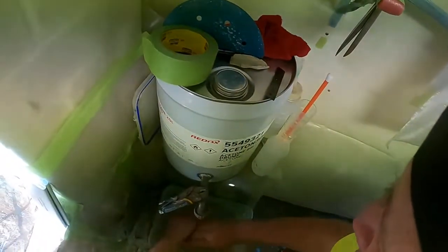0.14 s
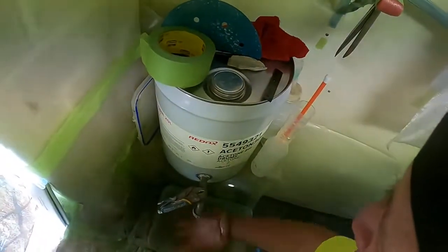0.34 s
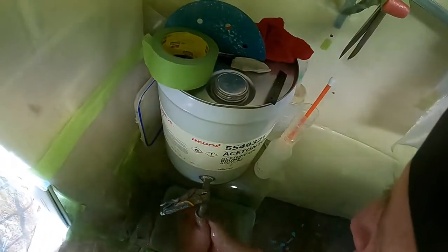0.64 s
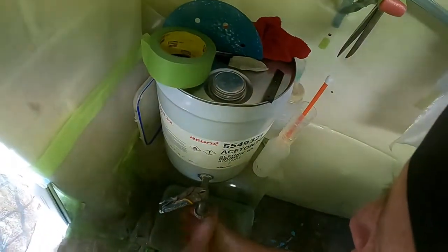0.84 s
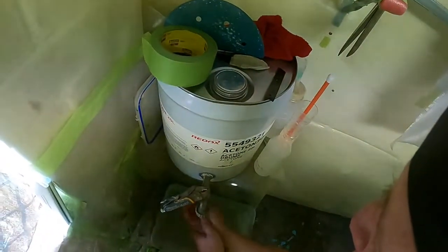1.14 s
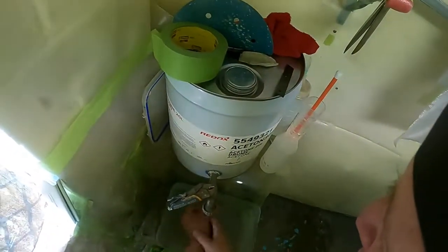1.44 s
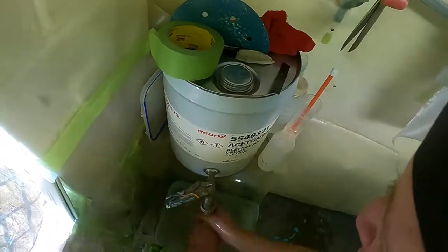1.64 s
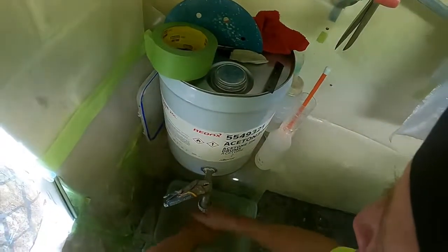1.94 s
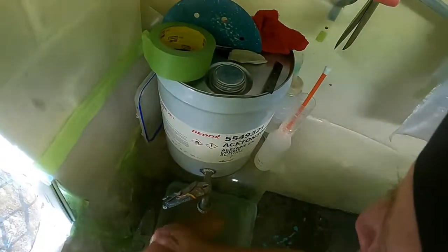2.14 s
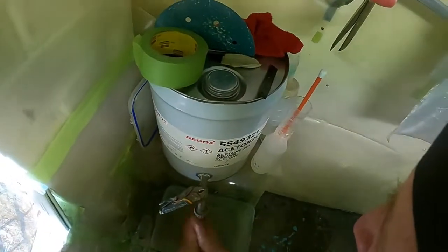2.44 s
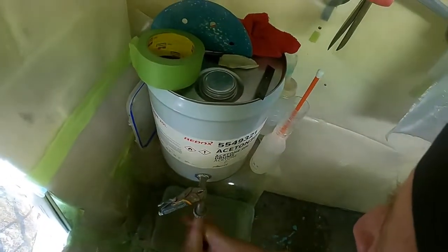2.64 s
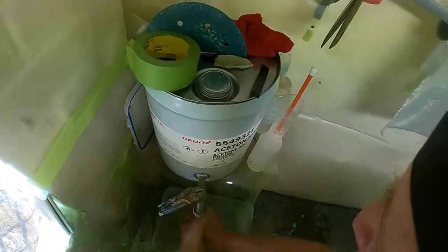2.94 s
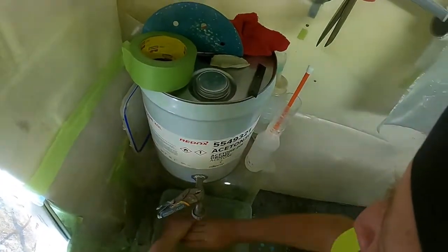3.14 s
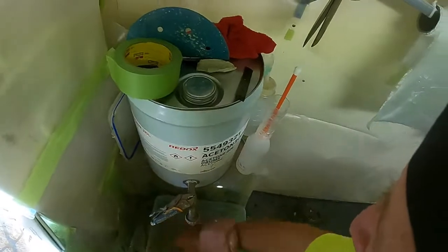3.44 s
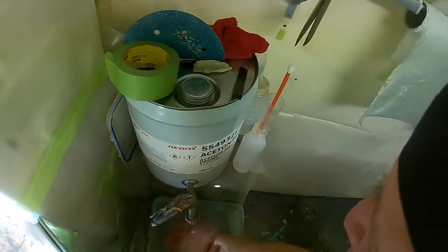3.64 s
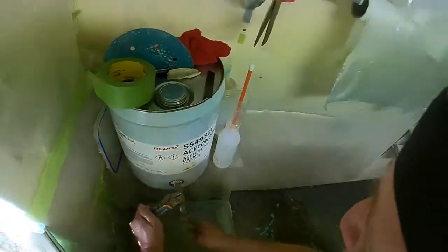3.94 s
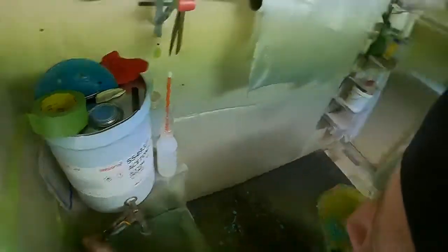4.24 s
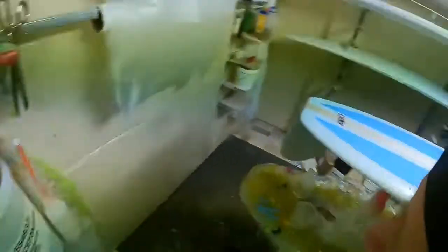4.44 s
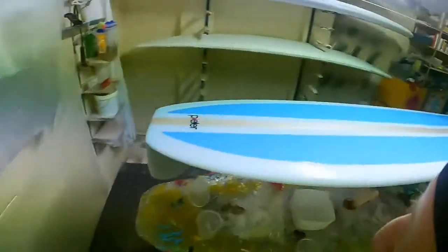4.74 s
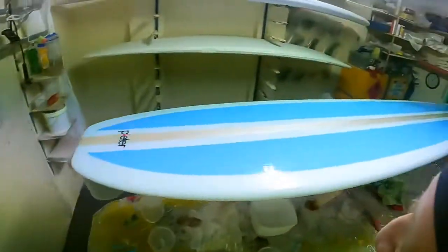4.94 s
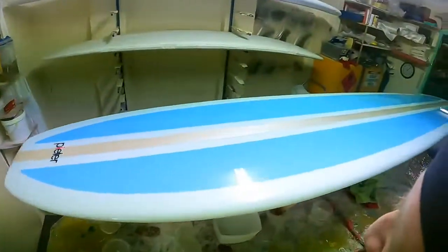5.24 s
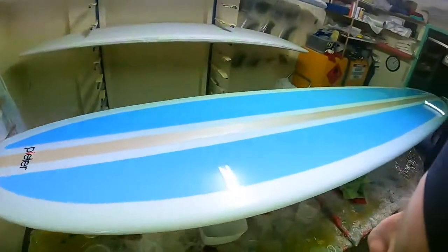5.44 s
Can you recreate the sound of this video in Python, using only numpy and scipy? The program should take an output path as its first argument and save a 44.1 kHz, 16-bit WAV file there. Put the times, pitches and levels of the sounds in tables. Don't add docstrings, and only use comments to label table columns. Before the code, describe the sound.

In a small, dry-sounding workshop, a thin stream breaks over rubbing hands: fizzy splashes, bright droplets, skin and sleeve rustle, dull wet-palm pops. At about four seconds the hands shake off last drops, then cloth rustles and heavier low thuds follow as the wearer turns. A body-worn camera in a closed case colours everything as boxy and resonant.

```python
import sys
import numpy as np
from scipy import signal
from scipy.fft import rfft, irfft, next_fast_len
from scipy.io import wavfile

SR = 44100
rng = np.random.default_rng(int(sys.argv[2]) if len(sys.argv) > 2 else 0)


def to_wav(s):
    ch = np.atleast_2d(s).T
    pcm = np.round(np.clip(ch, -1, 1) * 32767)
    wavfile.write(sys.argv[1], SR, pcm.astype(np.int16))


def boost(x):
    u = np.asarray(x, float) / 20
    return 10 ** u


N = 246122
HZ = np.fft.rfftfreq(next_fast_len(N + SR), 1 / SR)


def rms_one(x):
    return x / np.sqrt(np.mean(x ** 2) + 1e-20)


def at_hz(points):
    hz, value = np.transpose(points)
    return np.interp(np.log(HZ + 1), np.log(hz + 1), value)


def drift(rate_hz):
    pole = np.exp(-80 * np.pi * rate_hz / SR)
    white = rng.standard_normal(N // 40 + 2002)
    slow = signal.lfilter([1], [1, -2 * pole, pole * pole], white)[2000:]
    return np.interp(np.arange(N) / 40, np.arange(len(slow)), rms_one(slow))


def swells(rest_db, s, peak_db, fade_s, rise):
    t = np.arange(0, N + 32, 32) / SR
    late = (t[:, None] - s) / np.maximum(fade_s, .005)
    fallen_db = 10 * np.where(late > 0, late, -late / rise)
    power = np.sum(boost(2 * (peak_db - fallen_db)), axis=1)
    power = np.interp(np.arange(N) / SR, t, power)
    return 10 * np.log10(boost(2 * rest_db) + power + 1e-30)


def filtered(x, response):
    size = 2 * (len(HZ) - 1)
    return irfft(rfft(x, size) * response, size)[..., :N]


# (frequency [Hz], width [Hz], lift [dB])
CAVITIES = [(1530, 61, 4), (2887, 280, 7), (3980, 105, 5.5), (4770, 740, 8.5), (5600, 154, 7),
            (6090, 380, 8.5), (6530, 160, 9)]


def colour(x, spectrum, case=1):
    lift_db = sum(db / (1 + (2 * (HZ - hz) / width) ** 2) for hz, width, db in CAVITIES)
    level_db = at_hz(spectrum) + case * lift_db
    cepstrum = irfft(level_db * np.log(10) / 20)
    cepstrum[1:len(HZ) - 1] *= 2
    cepstrum[len(HZ):] = 0
    return filtered(x, np.exp(rfft(cepstrum)) / np.sqrt(np.mean(boost(2 * level_db))))


def in_room(x):
    room_t60_s, room_db = .1, -10
    t = np.arange(round(.2 * SR)) / SR
    tail = rng.standard_normal(len(t)) * boost(-60 * t / room_t60_s) * (t > .001)
    echo = signal.fftconvolve(x, tail / np.sqrt(np.sum(tail ** 2)))[:N]
    return np.array([x + boost(room_db) * echo, echo])


def ring(clicks, hz, t60):
    r, w = boost(-60 / (t60 * SR)), 2 * np.pi * hz / SR
    return signal.lfilter([0, np.sin(w)], [1, -2 * r * np.cos(w), r * r], clicks + 1e-18)


def plink(out, s, level_db, hz, t60, rise, attack_s):
    start, t = round(s * SR), np.arange(round(.08 * SR)) / SR
    tone = np.sin(2 * np.pi * hz * t * (1 + rise * t / t60))
    tone = tone * boost(-60 * t / t60) * (1 - np.exp(-t / attack_s))
    out = out.copy()
    out[start:start + len(t)] += boost(level_db) * tone
    return out


def dying(strengths, t60, attack_s):
    fall, swell = boost(-60 / (t60 * SR)), np.exp(-1 / (attack_s * SR))
    envelope = signal.lfilter([1 - swell], np.convolve([1, -fall], [1, -swell]), strengths)
    return envelope * rng.standard_normal((2, N))


# (time [s], level [dB])
FLOW = [(0.0, -57.5), (0.15, -64.5), (0.23, -60.5), (0.36, -56), (0.64, -55.5), (0.72, -59), (0.95, -61),
        (1.25, -64.5), (1.44, -55.5), (1.52, -57), (1.62, -62.5), (2.08, -60), (2.14, -56), (2.58, -58),
        (2.66, -64.5), (2.85, -63), (3.15, -59.5), (3.85, -62), (4.86, -62), (5.58, -69)]
# (peak time [s], splash level [dB], time to fade 10 dB [s], mist level [dB])
STROKES = [(0.108, -48.5, 0.04, -70.5), (0.26, -51, -0.1, -87), (0.66, -56, 0.02, -69),
           (0.8, -51.5, -0.17, -78), (1.37, -56.5, -0.03, -63), (1.681, -47, -0.0052, -62),
           (1.849, -50, 0.06, -65.5), (2.004, -48, -0.0649, -79), (2.24, -51, 0.02, -75),
           (2.38, -57, 0.05, -72), (2.46, -64, 0.05, -71), (2.527, -46.5, 0.0237, -69),
           (2.911, -48, -0.0865, -61.5), (3.182, -63, -0.0643, -56), (3.195, -50, -0.09, -71),
           (3.526, -47, 0.04, -70), (3.671, -56, 0.02, -73), (3.787, -58, -0.03, -56.5),
           (4.216, -58, 0, -76), (4.33, -53, 0.04, -78), (4.398, -47, 0, -75), (4.44, -50, -0.06, -66),
           (4.89, -52.5, 0.02, -89), (5.37, -58.5, 0.13, -85)]
# (frequency [Hz], level per Hz [dB])
SPLASH = [(900, -39.5), (2000, -14), (3300, -9.5), (4500, -3), (6000, -8), (7000, -7.5), (8000, -16),
          (10000, -50)]
# (frequency [Hz], level per Hz [dB])
MIST = [(5500, -29), (7200, -5.5), (8500, 7), (10000, -1.5), (11500, -14), (13000, -6), (15000, -45)]


def splash():
    drops_per_s = 600
    s, flow = np.transpose(FLOW)
    flow_db = np.interp(np.arange(N) / SR, s, flow)
    s, stroke_db, fade_s, stroke_mist_db = np.transpose(STROKES)
    splash_db = swells(flow_db, s, stroke_db, fade_s, rise=1)
    mist_rest_db = -79 + 0.62 * (flow_db + 61.0)
    mist_db = swells(mist_rest_db, s, stroke_mist_db, 0.92 * fade_s, rise=1)

    sizes = boost(2.5 * np.minimum(rng.exponential(1, N), 4)) * rng.choice([-1, 1], N)
    clump_db = .5 * drift(12) + 1.8 * drift(50)
    clicks = sizes * (rng.random(N) < drops_per_s * boost(clump_db) / SR)
    pitches, dealt = np.geomspace(1500, 14000, 20), rng.integers(0, 20, N)
    bubbles = rms_one(sum(ring(clicks * (dealt == k), hz, 64.0 / hz) for k, hz in enumerate(pitches)))
    film = boost(-0.5 + 1.1 * clump_db) * rng.standard_normal((2, N))
    liquid = boost(-5.5) * in_room(bubbles) + film
    return colour(boost(splash_db - 1.0) * liquid, SPLASH) + colour(boost(mist_db - 3.0) * liquid[::-1], MIST)


# (peak time [s], skin level [dB], time to fade 10 dB [s], sleeve level [dB])
RUBS = [(0.0, -57, 0.07, -65), (0.4, -62.5, 0.4, -83), (0.875, -59.5, 0.02, -60.5),
        (0.946, -56, -0.04, -59), (1.096, -52, 0.02, -59.5), (1.509, -55, -0.04, -90),
        (1.662, -54.5, 0.04, -68.5), (1.828, -52.5, 0.0468, -58.5), (2.05, -61, 0.32, -71.5),
        (2.87, -81, 0.08, -71.5), (3.015, -66, -0.01, -61), (3.4, -56, 0, -93.5), (3.508, -58, 0.12, -80),
        (3.85, -58.5, 0.07, -72), (3.95, -59, 0.09, -63.5), (4.26, -56, 0.13, -63),
        (4.538, -56, 0.05, -67.5), (4.695, -54.5, 0.04, -69), (4.8, -55, 0.05, -62.5),
        (4.899, -56, 0.07, -66.5), (5.08, -57, 0.04, -65), (5.18, -56, 0.05, -63), (5.3, -63, 0.2, -70)]
# (frequency [Hz], level per Hz [dB])
SKIN = [(500, -16.5), (900, -13), (1150, -1.5), (1700, -0.5), (2300, -11.5), (3500, -12.5), (6000, -25.5),
        (9000, -65.5)]
# (frequency [Hz], level per Hz [dB])
SLEEVE = [(150, -16.5), (280, 1), (450, 2.5), (750, 0.5), (950, -4.5), (1500, -40.5)]


def rustle():
    s, skin, fade_s, sleeve = np.transpose(RUBS)
    skin_db = swells(-65.5, s, skin, fade_s, rise=0.83)
    sleeve_db = swells(-79, s, sleeve, fade_s, rise=0.83)
    lumps = boost(0.68 * drift(25) + 1.7 * drift(44))
    white = rng.standard_normal((2, 2, N))
    return colour(boost(skin_db) * lumps * white[0], SKIN) + colour(boost(sleeve_db) * lumps * white[1], SLEEVE)


# (frequency [Hz], level per Hz [dB])
AIR = [(60, -35), (110, -21.5), (160, 1), (270, -1), (500, -5.5), (900, -30), (1080, -27), (1540, 4.5),
       (2360, -9), (4300, -6), (6300, -24), (7600, -22.5), (10000, -44), (13000, -59)]


def room_tone():
    level_db = -60 - 6.5 + .5 * drift(3.5)
    return colour(boost(level_db) * rng.standard_normal((2, N)), AIR, case=0.15)


def shake(level_db, spectrum, top_hz):
    wobble = colour(rng.standard_normal(N), spectrum, case=0)
    envelope = np.abs(signal.hilbert(wobble, next_fast_len(N))[:N])
    evened = rms_one(wobble / envelope ** .75)
    return signal.sosfilt(signal.butter(4, top_hz, fs=SR, output="sos"), boost(level_db) * evened)


# (peak time [s], sway level [dB], time to fade 10 dB [s], jolt level [dB], body thump level [dB])
MOVES = [(0.03, -40, 0.12, -48, -68.5), (0.13, -33, -0.05, -52, -71), (0.371, -57, -0.24, -62, -54),
         (0.64, -39, 0.7, -63, -76.5), (0.76, -36.5, 0.24, -57, -88), (0.87, -29.5, 0.15, -50.5, -68),
         (1.12, -34.5, 0.08, -54.5, -68), (1.57, -35, 0.17, -64, -83), (1.66, -32.5, -0.07, -70, -66),
         (1.82, -28.5, 0.2, -57.5, -68.5), (2.02, -26.5, 0.19, -55, -66), (2.25, -34.5, 0.34, -67, -67),
         (2.55, -39.5, 0.7, -72, -80), (3.07, -60, 0.11, -48.5, -64.5), (3.2, -32, 0.1, -82, -79),
         (3.509, -34.5, 0.13, -61, -67), (3.76, -28, 0.08, -57.5, -78), (4.085, -37, 0.1, -54.5, -62.5),
         (4.32, -45, 0.3, -51.5, -67), (4.778, -31.5, -0.11, -59, -64), (4.89, -43.5, 0.34, -52, -64),
         (4.97, -43, 0.11, -56, -60.5), (5.07, -34, 0.3, -42.5, -65), (5.19, -26, 0.22, -46, -61),
         (5.27, -42, 0.2, -50, -64.5)]
# (frequency [Hz], level per Hz [dB])
SWAY = [(5, -24.5), (10, 7.5), (22, 0), (35, -3.5), (48, -18), (60, -35), (100, -36)]
# (frequency [Hz], level per Hz [dB])
JOLT = [(30, -39.5), (50, 3.5), (65, -12), (85, -15.5), (110, -22), (200, -68.5)]
# (frequency [Hz], level per Hz [dB])
THUMP = [(70, -19), (120, -7.5), (150, 3), (200, 4), (270, -12), (500, -49.5)]


def moves():
    s, sway, fade_s, jolt, body = np.transpose(MOVES)
    sway_db = swells(-51, s, sway, fade_s, rise=0.96) - 11
    jolt_db = swells(-89, s, jolt, 0.35 * fade_s, rise=0.96)
    thump_db = swells(-74.5, s, body, 0.91 * fade_s, rise=0.96) + 2.55 * drift(32)
    thump = colour(boost(thump_db) * rng.standard_normal((2, N)), THUMP, case=0)
    return thump, shake(sway_db, SWAY, top_hz=45.6) + shake(jolt_db, JOLT, top_hz=116)


# (time [s], peak level [dB], pitch [Hz], coarse
# spray level [dB])
DROPS = [(0.0137, -32.5, 3990, -10.5), (0.0917, -34.5, 6650, -23), (0.241, -33, 6090, -59),
         (0.2676, -33.5, 4660, -19), (0.363, -36.5, 6010, -7.5), (0.446, -31, 6040, -32),
         (0.483, -40, 5530, -9), (0.592, -33, 4760, -14), (0.59, -36, 3900, -24),
         (0.8735, -35.5, 4760, -10.5), (0.9758, -38, 4750, -23), (1.2796, -37.5, 6160, -53),
         (1.3527, -22, 4570, -24), (1.354, -35, 6730, -27), (1.3595, -31, 4700, -30),
         (1.387, -33, 6680, -14), (1.5264, -35.5, 4690, -11.5), (1.6463, -28, 4640, -15),
         (1.6804, -39, 4500, -2.5), (1.787, -39, 6280, -25), (1.989, -33, 4780, -35),
         (2.034, -32.5, 4490, -25), (2.1131, -38, 4720, -9.5), (2.4678, -36, 6200, -15),
         (2.601, -39, 4640, -32), (2.9024, -38, 4650, -17), (3.097, -39, 4600, -6.5),
         (3.1776, -37, 3980, -6.5), (3.476, -31, 4740, -14), (3.5055, -26.5, 4810, -15),
         (3.529, -28, 4610, -20), (3.1695, -33, 6200, -29),
         (3.749, -39, 4700, -7.5), (3.787, -36.5, 6800, -16), (4.248, -39, 6270, -7),
          (3.944, -43, 6370, -18), (4.2064, -29, 4750, -7.5), (4.2072, -33, 3970, -19),
          (4.366, -30.5, 4680, -19), (4.3904, -24, 5600, -22), (4.3972, -24.5, 4720, -42),
          (4.4224, -35.5, 4580, -6.5), (4.486, -35, 4650, -15), (4.7656, -37.5, 4790, -23),
          (4.901, -36, 2980, -12.5),
         (0.0478, -35.5, 4650, -11), (0.3964, -48, 4660, -19), (0.539, -36, 5600, -12),
               (0.7412, -40, 6060, -11.5), (1.192, -39, 6170, -30), (1.2161, -45, 6670, -27),
               (1.3085, -45, 4820, -29), (1.429, -42, 4580, -25), (1.4676, -42, 4700, -5),
               (1.815, -34, 6260, -23), (1.8871, -39, 4800, -15), (2.1475, -45, 4890, -20),
               (2.1959, -39, 4700, -13), (2.251, -39, 4630, -12), (2.327, -48, 3960, -18),
               (2.4468, -46, 4800, -12), (2.5067, -35, 6540, -26), (2.5213, -33, 5600, -30),
               (2.5344, -36, 4920, -24), (2.743, -39.5, 4770, -15), (2.8926, -42, 4750, -18),
               (2.9828, -40, 4660, -20.5), (3.018, -37, 6500, -30), (3.0414, -57, 6240, -18),
               (3.6646, -40, 4700, -20), (4.0724, -39.5, 2860, -20), (4.3324, -39, 4700, -18),
               (4.391, -26.5, 4780, -27), (4.4424, -41, 4400, -9), (4.8705, -41, 4680, -18)]
# (frequency [Hz], level per Hz [dB])
COARSE = [(1500, -52.5), (2400, -0.5), (3000, 0.5), (4200, 3.5), (5500, -48), (9000, -70)]
# (frequency [Hz], level per Hz [dB])
FINE = [(3500, -24), (4800, 2), (6000, 4), (7200, 0.5), (9000, -13), (11500, -23), (14000, -49)]


def drops():
    tones, coarse, fine = np.zeros((3, N))
    for s, db, hz, coarse_db in DROPS:
        tones = plink(tones, s, db - 4.5, hz, min(127.0 / hz, .026), rise=0.0043, attack_s=0.00093)
        coarse[round(s * SR)] = boost(db + coarse_db - 6.5)
        fine[round(s * SR)] = boost(-51 + 0.16 * (db + 39.5) - 3)
    spray = colour(dying(coarse, 0.077, attack_s=0.001), COARSE)
    spray = spray + colour(dying(fine, 0.038, attack_s=0.00034), FINE)
    broken = np.clip(0.92 + 0.38 * drift(160), 0, 3)
    return in_room(tones * broken) + spray


# (time [s], peak level [dB], t60 [s])
SMACKS = [(0.0154, -45, 0.03), (0.2414, -44, 0.02), (0.3626, -46, 0.03), (0.483, -39, 0.038),
          (0.5906, -44, 0.03), (0.8729, -45.5, 0.03), (1.3493, -50, 0.03), (1.3533, -44, 0.03),
          (1.388, -42, 0.03), (1.4674, -56, 0.025), (1.6474, -53, 0.03), (1.6774, -50, 0.025),
          (1.7883, -47, 0.03), (2.1488, -44, 0.027), (2.7112, -50, 0.03), (2.7926, -64, 0.025),
          (2.9004, -53, 0.03), (3.178, -37, 0.04), (3.43, -46, 0.03), (3.477, -40.5, 0.035),
          (3.504, -40, 0.03), (3.527, -37, 0.027), (3.7489, -44, 0.037), (3.7864, -41.5, 0.025),
          (3.9447, -44.5, 0.028), (4.207, -42, 0.03), (4.3645, -41.5, 0.037), (4.3802, -36, 0.041),
          (4.3895, -39, 0.03), (4.4215, -41, 0.03), (4.4414, -53, 0.03), (4.7114, -58, 0.03),
          (4.8944, -50, 0.03)]
# (frequency [Hz], level per Hz [dB])
SMACK = [(1500, -32), (2500, -3), (4000, -5.5), (6000, 0), (7500, 0.5), (9000, -13), (11500, -30.5),
         (14000, -33)]


def smacks():
    envelope, t = np.zeros(N), np.arange(round(.1 * SR)) / SR
    for s, db, t60 in SMACKS:
        start = round(s * SR)
        envelope[start:start + len(t)] += boost(db - 6.5 - 60 * t / np.clip(t60, .006, .08))
    return colour(envelope * rng.standard_normal((2, N)), SMACK)


# (centre time [s], peak level [dB], pitch [Hz], time to fade 10 dB either side [s])
NUDGES = [(0.057, -39.0, 41, 0.049), (0.118, -37.0, 29, 0.034), (0.206, -45.0, 22, 0.058),
          (0.535, -44.0, 30, 0.034), (0.602, -38.0, 28, 0.034), (0.684, -39.0, 25, 0.036),
          (0.762, -38.0, 25, 0.025), (0.861, -32.0, 24, 0.06), (0.934, -40.0, 23, 0.025),
          (1.016, -43.0, 27, 0.06), (1.126, -33.0, 29, 0.04), (1.209, -48.0, 26, 0.026),
          (1.36, -45.0, 26, 0.035), (1.59, -37.0, 26, 0.06), (1.708, -40.0, 22, 0.036),
          (1.874, -33.0, 24, 0.06), (2.097, -38.0, 25, 0.06), (2.211, -37.0, 24, 0.027),
          (2.272, -36.0, 25, 0.06), (2.487, -43.0, 26, 0.025), (2.57, -40.0, 29, 0.06),
          (2.678, -42.0, 28, 0.039), (2.906, -42.0, 26, 0.06), (2.981, -47.0, 31, 0.026),
          (3.072, -46.0, 40, 0.025), (3.134, -40.0, 28, 0.025), (3.215, -40.0, 26, 0.06),
          (3.528, -36.0, 28, 0.06), (3.744, -42.0, 26, 0.056), (3.833, -42.0, 27, 0.053),
          (3.926, -39.0, 28, 0.047), (3.996, -41.0, 25, 0.025), (4.08, -34.0, 30, 0.033),
          (4.165, -45.0, 23, 0.046), (4.327, -40.0, 32, 0.034), (4.52, -41.0, 30, 0.037),
          (4.596, -47.0, 27, 0.041), (4.691, -46.0, 28, 0.025), (4.786, -32.0, 26, 0.06),
          (4.88, -31.0, 31, 0.027), (4.944, -38.0, 27, 0.025), (5.01, -39.0, 24, 0.025),
          (5.077, -22.0, 33, 0.038), (5.269, -29.0, 31, 0.042), (5.373, -41.0, 33, 0.035),
          (5.497, -46.0, 31, 0.032)]


def nudges():
    out, t = np.zeros(N + SR), np.arange(-SR // 4, SR // 4) / SR
    for (s, db, hz, fade_s), turn in zip(NUDGES, rng.random(len(NUDGES))):
        swell = boost(db - 10 * (t / np.clip(fade_s, .032, .07)) ** 2)
        start = round(s * SR)
        out[start:start + len(t)] += swell * np.sin(2 * np.pi * (hz * t + turn))
    return out[SR // 4:SR // 4 + N]


# (time [s], peak level [dB], pitch [Hz], t60 [s])
SLAPS = [(0.095, -32, 1536, 0.016), (0.867, -41.5, 1283, 0.04), (1.019, -33, 1030, 0.01),
         (1.094, -35.5, 1457, 0.021), (1.342, -38.5, 1250, 0.02), (1.372, -36.5, 1980, 0.015),
         (1.468, -39, 1624, 0.029), (1.51, -35.5, 2450, 0.027), (0.942, -48, 1200, 0.019),
         (1.817, -41.5, 454, 0.051), (4.205, -36, 2850, 0.036), (4.43, -42, 2876, 0.05),
         (1.807, -48, 1550, 0.021), (1.818, -37.5, 1530, 0.03), (2.022, -35, 414, 0.0051),
         (3.014, -33.5, 1550, 0.017), (3.518, -34, 1930, 0.026), (3.943, -33, 1590, 0.017),
         (4.254, -38.5, 1440, 0.03), (4.537, -31.5, 1424, 0.029), (4.689, -40.5, 1520, 0.014),
         (4.898, -31.5, 1626, 0.025), (5.079, -46, 487, 0.023), (5.177, -40, 1676, 0.027)]


def slaps():
    tones, puff = np.zeros(N), np.zeros(N)
    for s, db, hz, t60 in SLAPS:
        tones = plink(tones, s, db + 3.5, hz, np.clip(t60, .006, .08), rise=0.059, attack_s=0.007)
        puff[round(s * SR)] = boost(db - 18.0)
    return in_room(tones) + colour(dying(puff, 0.085, attack_s=0.0055), SKIN)


# (frequency [Hz], left-right likeness [0-1])
LIKENESS = [(130, 0.7), (260, 0.74), (550, 0.14), (820, 0.56), (1260, 0.71), (1700, 0.92), (2400, 0.74),
            (3400, 0.37), (4600, 1), (7200, 0.94), (9500, 0.83), (12500, 0.12)]
# (frequency [Hz], left over right [dB])
LEAN = [(60, -42), (120, 1.5), (240, -5), (470, -3), (920, -3), (1830, 4.5), (3000, 3.5), (3900, 1),
        (5000, -3), (7170, 0), (9500, 1.5)]
# (frequency [Hz], left ahead [rad])
LEAD = [(0, 0.65), (860, -0.13), (1250, -0.38), (2500, -0.38), (3010, -1.2), (3700, -0.23), (4310, -0.55),
        (7320, 0.042)]


def ports(near, other):
    alike = np.clip(at_hz(LIKENESS), 0, 1)
    half = boost(at_hz(LEAN) / 2) * np.exp(.5j * at_hz(LEAD))
    sides = np.array([half, 1 / half])
    shared, opposed = np.sqrt((1 + alike) / 2), np.sqrt((1 - alike) / 2)
    return filtered(near, shared * sides) + filtered(other, opposed * sides * [[1], [-1]])


def scene():
    thump, rumble = moves()
    heard = splash() + rustle() + room_tone() + thump + drops() + smacks() + slaps()
    return ports(*heard) + rumble + nudges()


def roll_off(x):
    return signal.sosfilt(signal.butter(12, 12800, fs=SR, output="sos"), x)


def record(dry):
    return roll_off(dry)


dry = scene()
out = record(dry)
to_wav(out)
```